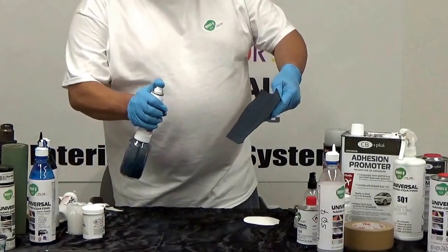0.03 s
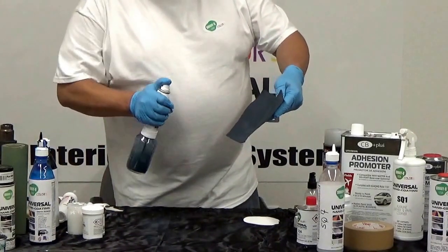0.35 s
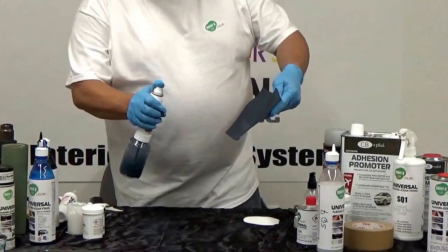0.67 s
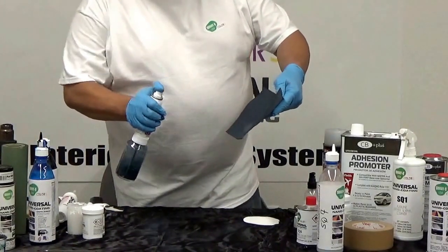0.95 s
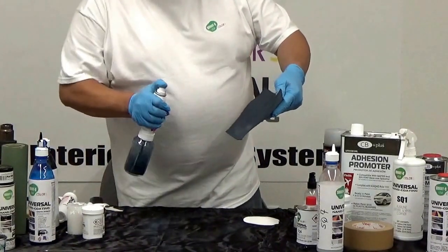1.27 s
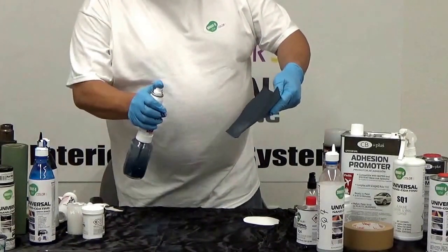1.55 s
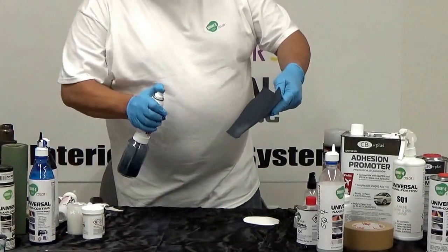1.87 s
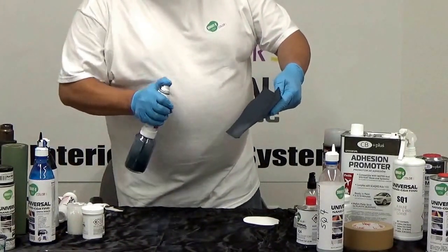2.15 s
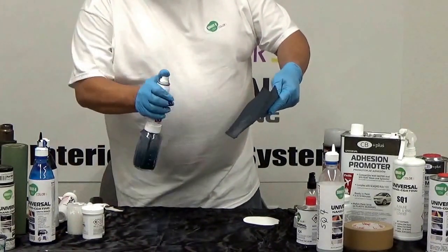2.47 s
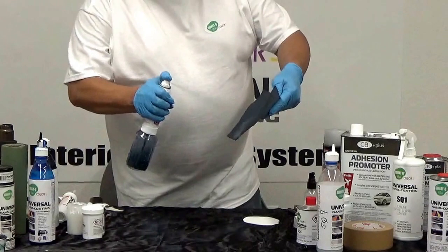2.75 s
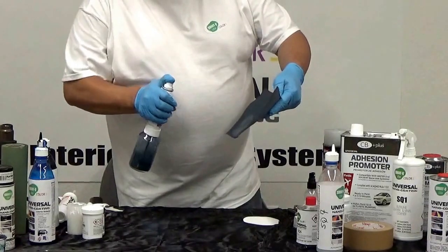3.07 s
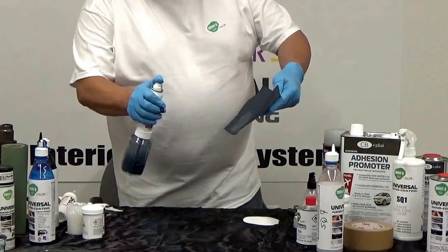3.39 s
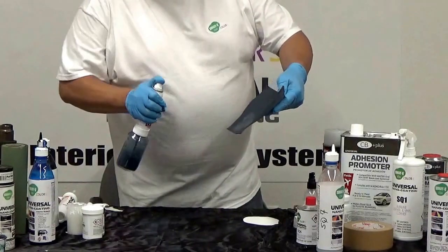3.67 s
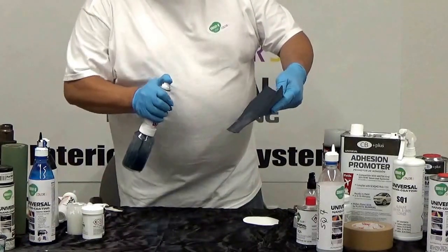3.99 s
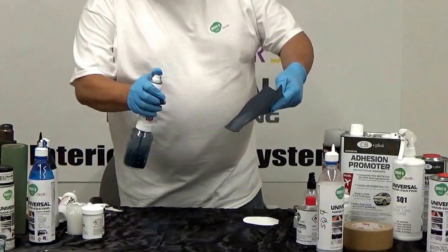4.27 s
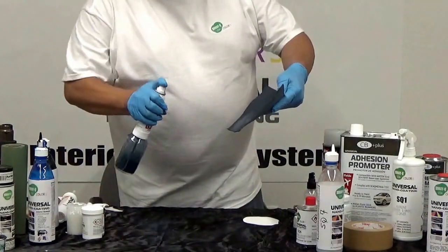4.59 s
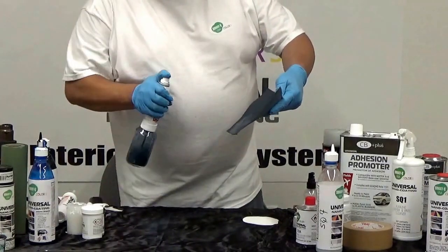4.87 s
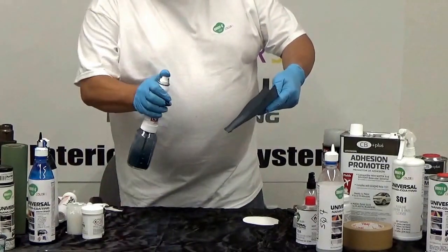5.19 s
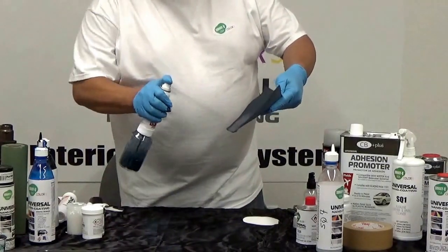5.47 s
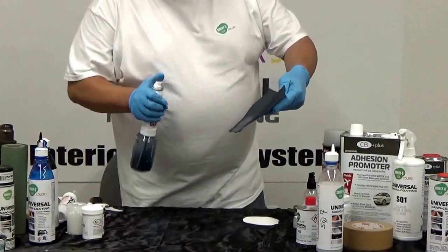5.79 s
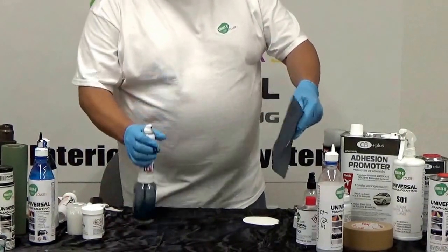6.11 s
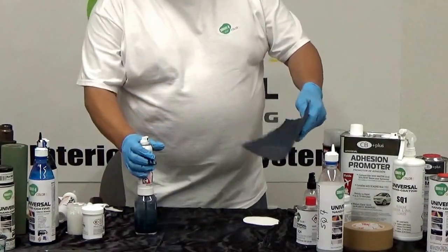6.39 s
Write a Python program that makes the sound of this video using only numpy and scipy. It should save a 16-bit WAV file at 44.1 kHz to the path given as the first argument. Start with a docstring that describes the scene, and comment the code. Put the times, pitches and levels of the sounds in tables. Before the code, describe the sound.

Close to the microphone in a hard-walled workshop, a small pump bottle mists liquid in quick, evenly spaced spritzes, each a crisp hiss. A gloved grip gives a tiny creak along the way. The spraying stops, and the bottle lands on a cloth-covered table with a booming thump and a brief dull rattle. Quiet ventilation, mains hum and a faint fan flutter continue underneath.

```python
"""Short, bright hisses of mist: a finger-pump bottle, sprayed thirteen times near a stereo microphone
pair in a bare workshop. Each stroke surges as the valve opens, fills out into a broader mist and spits
as the piston bottoms out. The grip creaks; the bottle is set down on a table with a thump that leaves
the room ringing. Farther back: ventilation, mains hum, a faint fast flutter like a dry fan bearing,
one soft rustle and a faint passing tone."""
import sys
import numpy as np
from scipy import signal
from scipy.fft import rfft, irfft, next_fast_len
from scipy.io import wavfile
from scipy.ndimage import map_coordinates

SR = 44100
rng = np.random.default_rng(int(sys.argv[2]) if len(sys.argv) > 2 else 0)


def master_out(mix):
    """Clip the mix to full scale and print it as 16-bit PCM to the path in sys.argv[1]."""
    frames = np.transpose(np.atleast_2d(mix))
    ceiling = np.clip(frames, -1, 1)
    pcm = np.round(ceiling * 32767).astype(np.int16)
    wavfile.write(sys.argv[1], SR, pcm)


N = 293265

# pump strokes: start t/s, surge delay t/s, piston travel t/s, hiss level/dB, spit over hiss level/dB
STROKES = [(.107, 0.025, 0.18, -41.5, 6), (.562, 0.024, 0.16, -41, 9), (.956, 0.034, 0.19, -41, 8.5),
           (1.418, 0.023, 0.15, -41, 8), (1.812, 0.015, 0.15, -40.5, 9), (2.297, 0.0038, .112, -41.5, 12),
           (2.74, .007, 0.15, -41, -10), (3.208, 0.021, 0.14, -41.5, -9), (3.574, 0.029, 0.16, -40, 9),
           (4.013, 0.025, 0.21, -40.5, 4), (4.548, 0.013, .16, -40, 7), (5.015, 0.021, .13, -40.5, 10.5),
           (5.446, 0.0033, .146, -39.5, -8)]
# hiss at the nozzle: f/Hz, relative level/dB
NOZZLE_SPECTRUM = [(500, -61), (2000, -37), (3500, -9.5), (5500, -5.5), (7000, -6), (8500, -1.5),
                   (9800, 3.5), (10500, 3.5), (11000, -3.5)]
# cone of mist: f/Hz, relative level/dB
MIST_SPECTRUM = [(300, -26), (900, -9.5), (1500, -8.5), (1900, -3.5), (2300, -3.5), (2950, 4), (3250, -2),
                 (4000, -6), (5000, -2.5), (6500, 1), (8500, -0.5), (10000, 2.5), (11000, -2)]
# creaks of glove and plastic: t/s, level/dB, f/Hz, 60 dB decay t/s
CREAKS = [(1.702, -35, 2600, 0.015), (6.057, -45, 2860, 0.013), (6.0916, -45, 2620, 0.017),
          (6.196, -51, 9200, 0.015)]
# the bottle's base meets the table, edge first: t/s, level/dB
LANDING = [(6.3451, -22), (6.355, -13.5)]
# modes of the table top: f/Hz, relative level/dB, 60 dB decay t/s
TABLE_MODES = [(176.7, 0, 0.12), (244, 5, 0.091), (280, -16, 0.041), (457, -7, 0.048), (570, -29, 0.026),
               (740, -30, 0.074)]
# standing waves of the workshop: f/Hz, relative level/dB, 60 dB decay t/s
ROOM_MODES = [(142.9, -9, 0.98), (158.4, -2, 0.4), (175.4, 7.5, 0.4), (217, -1.5, 0.68), (227, -4, 0.53),
              (250, -1.5, 0.6), (269.4, -6.5, 0.7), (282, -1.5, 0.53), (308, -8.5, 0.76), (332, -9, 0.88),
              (407, -13.5, 0.8), (440, -13, 0.9), (474, -15.5, 0.71), (495, -15, 0.72), (556, -14, 0.86),
              (590, -17, 1), (684, -29, 0.55), (762, -18, 0.67)]
# jolted objects: f/Hz, relative level/dB
RATTLE_SPECTRUM = [(120, -13), (200, 22.5), (350, 19), (600, 18), (820, 10), (950, 5), (1200, 2),
                   (1600, -1.5), (2200, -1), (3600, -4.5), (5500, -15), (8000, -16), (11000, -29)]
# soft rustle: f/Hz, relative level/dB
RUSTLE_SPECTRUM = [(150, -30), (330, 1), (430, -1), (550, 2), (750, -1), (1100, -22), (3000, -40)]
# rumble of the ducts: f/Hz, relative level/dB
DUCT_SPECTRUM = [(20, -19), (33, -22), (46, 0), (68, -3), (90, -11.5), (130, -10.5), (175, -8),
                 (215, -15.5), (330, -13.5), (450, -18), (700, -18), (1000, -26), (1600, -45)]
# hiss of moving air: f/Hz, relative level/dB
AIR_SPECTRUM = [(530, -13.5), (900, -4), (1230, -5.5), (1380, -7.5), (1500, -6.5), (2310, -9), (2510, -6.5),
                (2820, -10), (4290, -10.5), (5810, -12), (11000, -16.5), (14300, -58), (22000, -120)]
# course of the fan flutter: t/s, level/dB
FAN_LEVELS = [(0, -69), (1.15, -62), (2.4, -79), (3.1, -65), (4.4, -65), (5.95, -64.5), (6.25, -70),
              (6.65, -73)]
# mains partials: f/Hz, rms level/dB
HUM_PARTIALS = [(59.8, -66), (120, -61.5), (240, -69.5), (360, -72.5), (600, -76), (720, -76.5)]
# ventilation at the two microphones: f/Hz, left-right likeness (1 = identical)
AIR_LIKENESS = [(50, 1), (250, 0.77), (600, 0.3), (1500, 0.11), (3000, 0.43), (10000, 0.76)]
# reverberation at the two microphones: f/Hz, left-right likeness
ROOM_LIKENESS = [(150, 1), (400, 0.95), (1000, 0.55), (2500, 0.6), (5000, 0.61), (9500, 0.73)]
# reverberation of the workshop: f/Hz, 60 dB decay t/s
ROOM_DECAY = [(150, 0.97), (800, 0.94), (3000, 0.63), (6000, 0.66), (10500, 0.44)]


def spray(mist_db=-2, surge_db=3, droop_db_per_s=-1, flutter_db=1.1):
    """Near the microphones, the nozzle hisses and surges, mist fills out, and the last liquid spits."""
    open_s, fill_s, surge_s = 0.0015, 0.014, 0.017  # valve opens; cone fills; length of the surge
    drain_s, shut_s = 0.0063, 0.016  # chamber drains after the piston stops; valve shuts
    t, jet, cone = clock(), np.zeros(N), np.zeros(N)
    for start, surge_delay, travel, db, spit_db in STROKES:
        age = t - start
        valve = 1 - rise(age - travel - drain_s, shut_s)
        pressure = amp(droop_db_per_s * np.clip(age, 0, travel)) * valve
        surge = amp(surge_db) * bump(age - surge_delay, surge_s)
        spit_s = 0.0052 * (travel / 0.15) ** 4.4  # slower strokes draw the spit out
        spit = amp(spit_db) * bump(age - travel, spit_s)
        jet += amp(db) * rise(age, open_s) * np.hypot(pressure, surge + spit)
        cone += amp(db + mist_db) * rise(age, fill_s) * pressure
    hiss = jet * noise(NOZZLE_SPECTRUM) + cone * noise(MIST_SPECTRUM)
    return hiss * amp(flutter_db * wobble(120))


def table_thump(contact_s=0.0032, radiate_hz=135):
    """The cloth-covered table booms under the bottle."""
    out = np.zeros(N)
    for start, db in LANDING:
        age = clock() - start
        boom = sum(amp(level) * fade(age, t60) * np.sin(2 * np.pi * hz * age)
                   for hz, level, t60 in TABLE_MODES)
        out += amp(db) * rise(age, contact_s) * boom
    # an open board radiates almost no deep bass
    return signal.sosfilt(signal.butter(4, radiate_hz, "highpass", fs=SR, output="sos"), out)


def standing_waves(level_db=-26.5, build_s=0.0048, offset_rad=0.37):
    """Low room modes ring on after the landing, reaching the two microphones slightly out of step."""
    age, out = clock() - LANDING[0][0], np.zeros((2, N))
    for hz, db, t60 in ROOM_MODES:
        phase = offset_rad * rng.choice([-1, 1]) * np.array([[1], [-1]])
        envelope = amp(level_db + db) * rise(age, build_s) * fade(age, t60)
        out += envelope * np.sin(2 * np.pi * hz * age + phase)
    return out


def rattle(level_db=-34, attack_s=0.0078, t60=0.38):
    """The landing jolts the bottle and the things around it into a brief dull rattle."""
    age = clock() - LANDING[0][0]
    return amp(level_db) * rise(age, attack_s) * fade(age, t60) * noise(RATTLE_SPECTRUM)


def grip_creaks(relative_width=0.18):
    """Glove and plastic creak briefly in the grip, each time in one band of noise."""
    t, out = clock(), np.zeros(N)
    for start, db, hz, t60 in CREAKS:
        resonance = lambda f: 1 / np.hypot(1, (f / hz - hz / (f + 1)) / relative_width)
        ring = unit(filtered(rng.standard_normal(N), resonance))
        out += amp(db) * ring * rise(t - start, 0.0012) * fade(t - start, t60)
    return out


def room(x, wet_db, gap_s=0.0005, build_s=0.0042):
    """The microphones take the direct sound plus the diffuse answer of hard walls."""
    hz, t, bands = signal.stft(rng.standard_normal((2, SR)), SR, nperseg=256)
    tail = signal.istft(bands * fade(t, along(ROOM_DECAY, hz)[:, None]), SR, nperseg=256)[1]
    tail = spread(tail, ROOM_LIKENESS) * rise(np.arange(tail.shape[1]) / SR - gap_s, build_s)
    tail /= np.linalg.norm(tail[0])
    return x + amp(wet_db) * signal.fftconvolve(x[None], tail, axes=1)[:, :len(x)]


def shifting_reflections(x, wet_db):
    """The hand drifts, so every stroke meets a different pattern of reflections."""
    out = np.zeros((2, N + SR))
    edges = [0] + [round((stroke[0] - 0.01) * SR) for stroke in STROKES[1:]] + [N]
    for a, b in zip(edges, edges[1:]):
        out[:, a:b + SR] += room(np.pad(x[a:b], (0, SR)), wet_db)
    return out[:, :N]


def rustle(at_s=1.265, length_s=0.11, level_db=-59):
    """A soft dull rustle, perhaps of a sleeve."""
    return amp(level_db) * bump(clock() - at_s, length_s) * noise(RUSTLE_SPECTRUM)


def ventilation(rumble_db=-56, air_db=-59):
    """Duct rumble and airy hiss waver all around the microphones."""
    rumble = coloured(spread(rng.standard_normal((2, N)), AIR_LIKENESS), DUCT_SPECTRUM)
    air = coloured(spread(rng.standard_normal((2, N)), AIR_LIKENESS), AIR_SPECTRUM)
    return rumble * amp(rumble_db + 0.66 * wobble(5)) + air * amp(air_db + 0.33 * wobble(2.444))


def mains_hum():
    """Mains hum sits in the centre, slightly unsteady in level and phase."""
    out = np.zeros(N)
    for hz, db in HUM_PARTIALS:
        peak = np.sqrt(2) * amp(db + 0.79 * wobble(3.05))
        out += peak * np.sin(2 * np.pi * hz * clock() + 0.56 * wobble(2.985))
    return out


def fan_bearing(turns_per_s=30, low_hz=2480, high_hz=2990, glide_s=0.0045, t60=0.042, width_hz=130):
    """Far back, the bearing rubs once a turn: a narrow rasp that slides up in pitch and dies down."""
    turns = clock() * turns_per_s + 0.12 * wobble(12)
    age = (turns % 1) / turns_per_s
    pitch = high_hz + (low_hz - high_hz) * np.exp(-age / glide_s)
    phase = 2 * np.pi * np.cumsum(pitch) / SR
    roughness = filtered(rng.standard_normal((2, N)), lambda hz: 1 / (1 + (hz / width_hz) ** 2))
    rasp = roughness[0] * np.cos(phase) + roughness[1] * np.sin(phase)
    rub = 0.12 + rise(age, 0.0025) * fade(age, t60) * amp(wobble(30))  # steady floor, uneven pulses
    level_db = np.interp(clock(), *np.transpose(FAN_LEVELS))
    return amp(level_db) * unit(rub * rasp)


def faint_tone(at_s=3.4, length_s=0.58, pitch_hz=537, level_db=-68):
    """A thin distant tone swells and fades."""
    tone = np.sqrt(2) * np.sin(2 * np.pi * pitch_hz * clock() + 0.24 * wobble(4.7))
    return amp(level_db) * bump(clock() - at_s, length_s) * tone


def amp(db):
    """Decibels to gain."""
    return 10 ** (np.asarray(db) / 20)


def unit(x):
    """Scale to rms 1."""
    return x / np.sqrt(np.mean(x ** 2) + 1e-20)


def clock():
    """The time of every sample."""
    return np.arange(N) / SR


def rise(t, attack):
    """Zero before t = 0, then climbing to 1."""
    return 1 - np.exp(-np.maximum(t, 0) / attack)


def fade(t, t60):
    """A decay from t = 0, down 60 dB at t60."""
    return amp(-60 * np.maximum(t, 0) / t60)


def bump(t, length):
    """A bell-shaped swell centred on t = 0."""
    return np.exp(-2 * (t / length) ** 2)


def wobble(rate):
    """A smooth random curve, rate knots a second."""
    return map_coordinates(rng.standard_normal(int(N * rate / SR) + 4), [clock() * rate])


def along(points, hz):
    """Points of f/Hz and value, read on a log frequency axis."""
    f, values = np.transpose(points)
    return np.interp(np.log(hz + 1), np.log(f + 1), values)


def filtered(x, response):
    """x through a frequency response."""
    n = x.shape[-1]
    padded = next_fast_len(n + SR // 4)
    return irfft(rfft(x, padded) * response(np.fft.rfftfreq(padded, 1 / SR)), padded)[..., :n]


def coloured(x, spectrum):
    """x shaped by a spectrum, at rms 1."""
    return unit(filtered(x, lambda hz: amp(along(spectrum, hz))))


def noise(spectrum):
    """Mono noise of a given spectrum, at rms 1."""
    return coloured(rng.standard_normal(N), spectrum)


def spread(pair, likeness):
    """Two unrelated signals mixed into left and right of a given likeness."""
    turn = lambda hz: np.arccos(np.clip(along(likeness, hz), -1, 1)) / 2
    mid, side = filtered(pair, lambda hz: np.array([np.cos(turn(hz)), np.sin(turn(hz))]))
    return np.array([mid + side, mid - side])


def scene():
    """The workshop from the microphones: bottle and table in front, room tone behind."""
    bottle = shifting_reflections(spray(), wet_db=0) * amp([[-0.05], [0.05]])  # left, right
    contacts = room(grip_creaks() + table_thump(), wet_db=-8.5)
    stirrings = room(rattle() + rustle(), wet_db=-1.5)
    room_tone = ventilation() + mains_hum() + fan_bearing() + faint_tone()
    return bottle + contacts + stirrings + standing_waves() + room_tone


def record(dry, top_hz=11060):
    """The camera's microphone channels keep nothing above their band limit."""
    return filtered(dry, lambda hz: hz < top_hz)


dry = scene()
out = record(dry)
master_out(out)
```